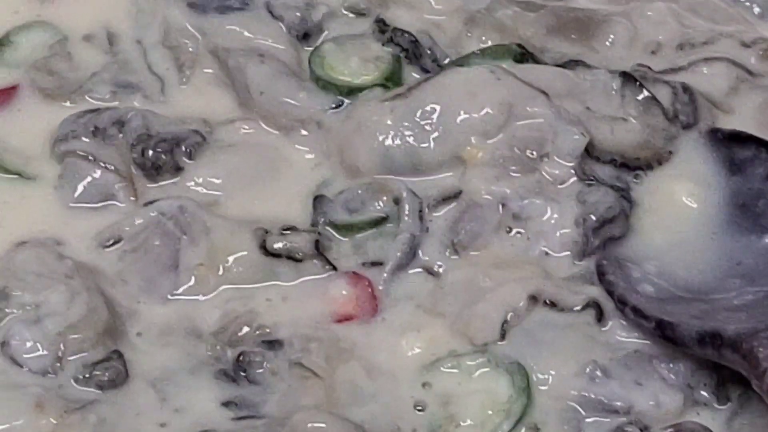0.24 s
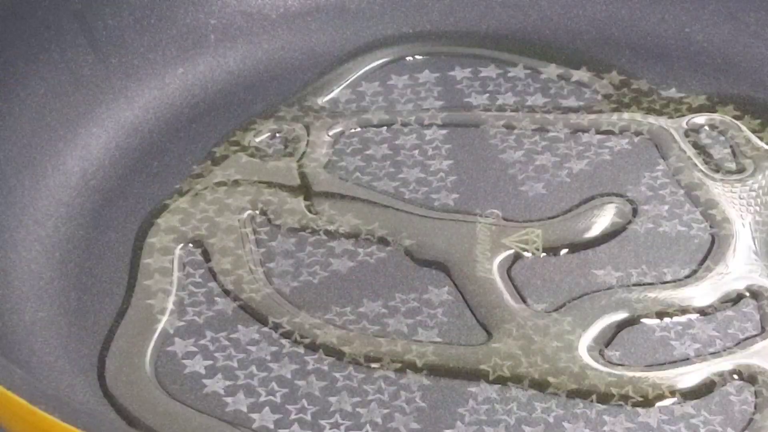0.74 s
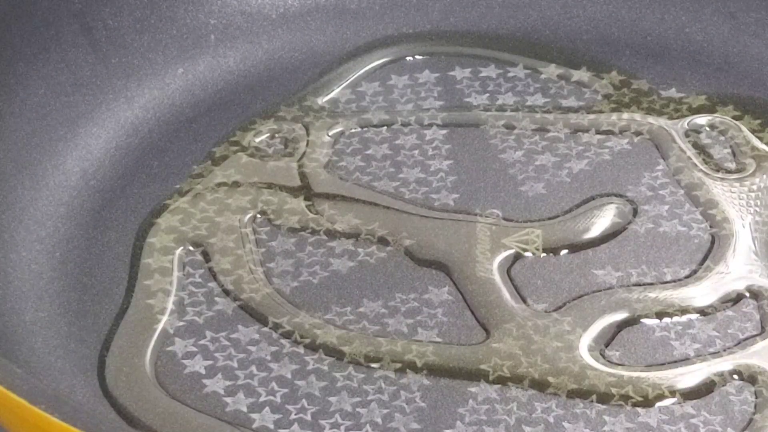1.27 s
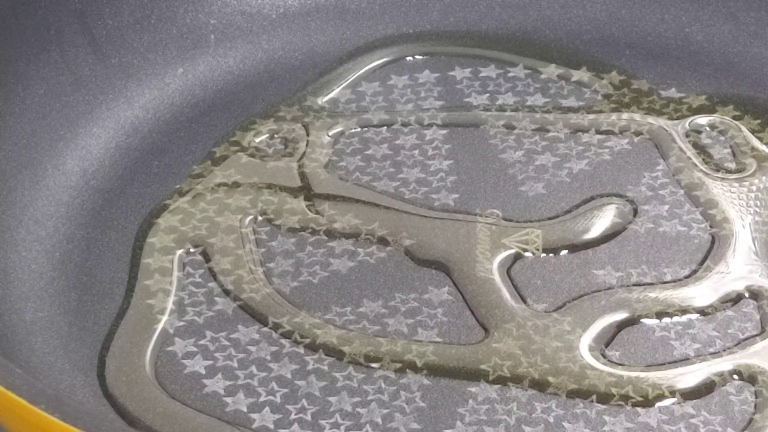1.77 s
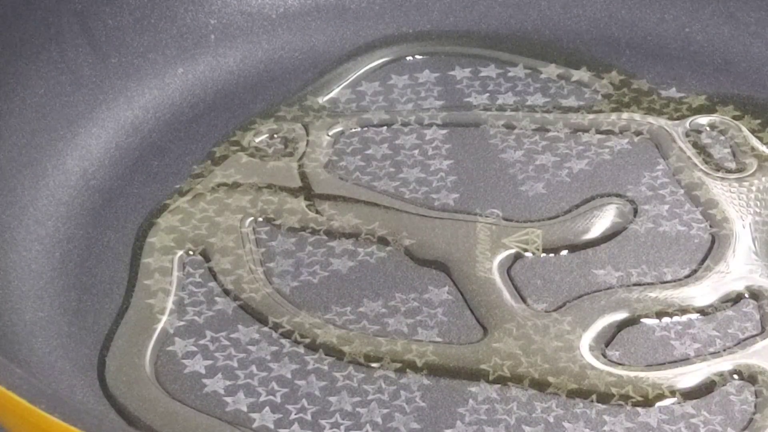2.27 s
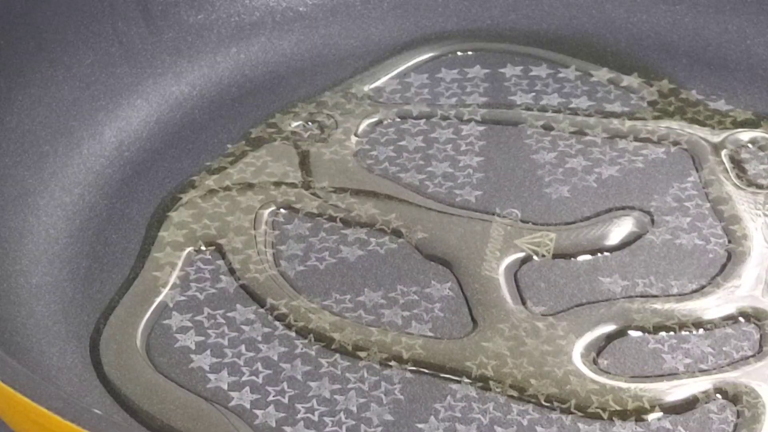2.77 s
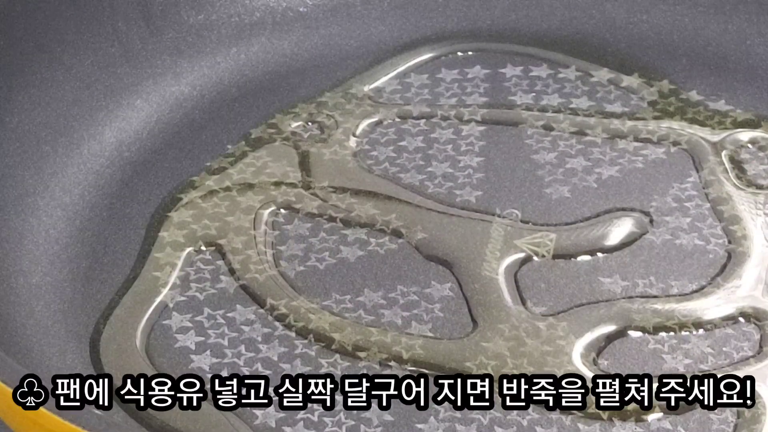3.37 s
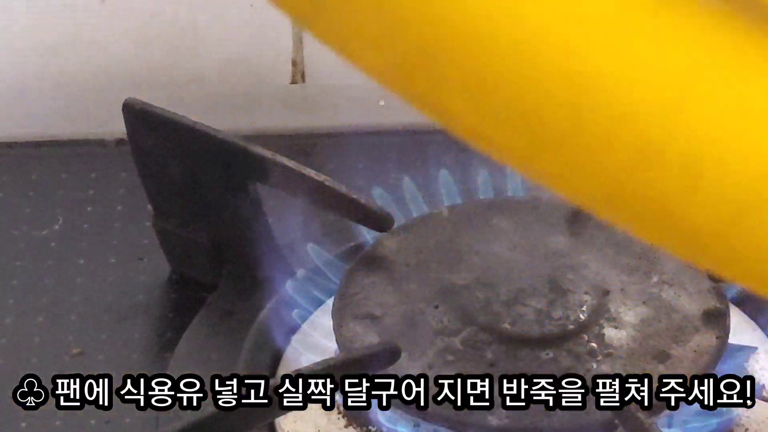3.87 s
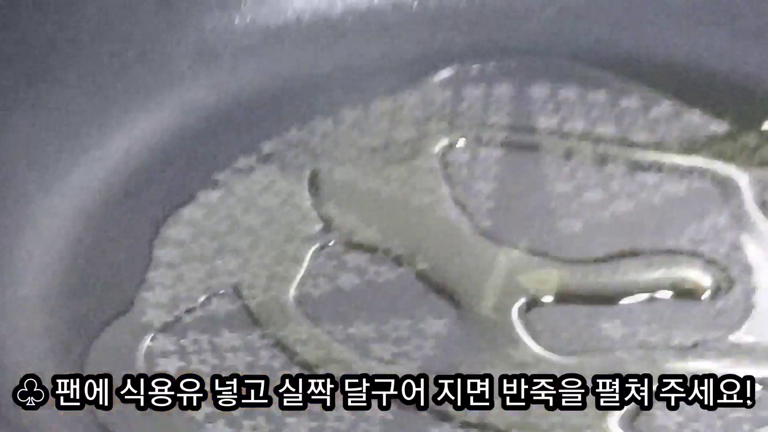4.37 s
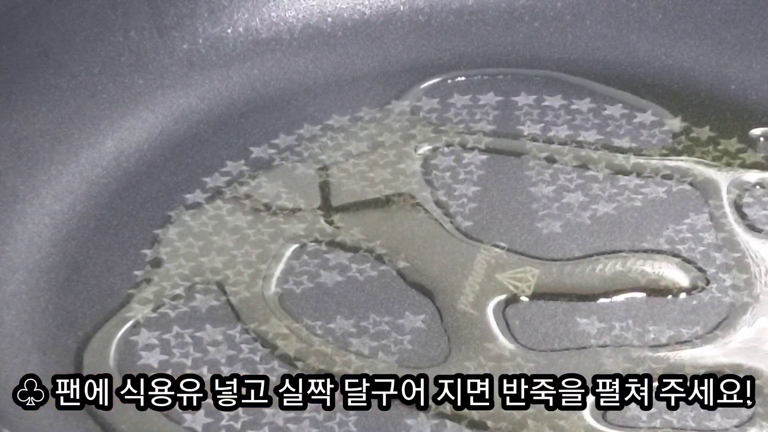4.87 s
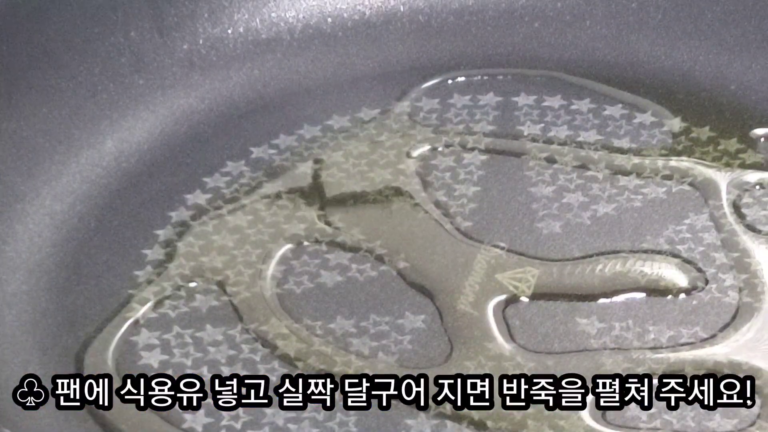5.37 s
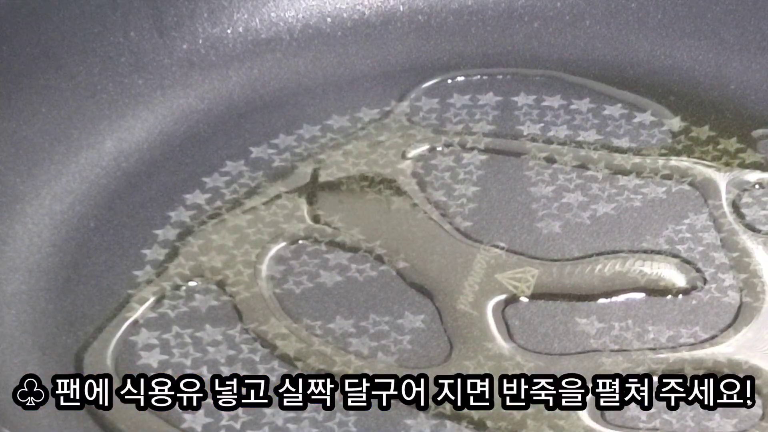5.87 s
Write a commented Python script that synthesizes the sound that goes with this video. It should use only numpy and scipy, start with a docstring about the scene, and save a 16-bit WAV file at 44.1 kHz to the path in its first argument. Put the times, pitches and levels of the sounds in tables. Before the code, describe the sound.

A home kitchen, heard close and fairly dry in stereo. For the first 2.5 s there is only low, soft room noise with tiny handling bumps and faint tones. At about 0.9 s a utensil knocks the worktop with a solid low thud, followed until 1.3 s by a scatter of smaller, duller taps, the clearest near 1.06 s. Faint wet, resonant noise and fine hiss swell and fade around them, and again near 1.7-1.9 s with a weak tick. At 2.5 s a gas burner cuts in abruptly: low fluttering rush under a thin, whistling hiss, continuing to the end. Two soft bumps come near 2.9 s. At 3.6 s the pan is nudged with a low, short judder. At 4.5 s it scrapes loudly and clanks several times on the iron grate, bright and quickly damped, until 4.65 s. The flame dips around 5.1 s; light knocks follow near 5.55, 5.8 and 6.0 s.

```python
"""A frying pan on a gas stove, miked close in a home kitchen: nudged, then scraped and clanked on the grate.
Slips and blows excite its ringing modes, with noise for the iron; three light knocks follow.
From 2.5 s a gas burner rushes and hisses under it, as two bands of shaped noise.
Before that, over low room noise, faint resonant noise and hiss swell up, and utensils knock on the
worktop (decaying modes)."""
import sys
import numpy as np
from scipy import signal
from scipy.fft import rfft, irfft, next_fast_len
from scipy.io import wavfile

SR = 44100
rng = np.random.default_rng(int(sys.argv[2]) if len(sys.argv) > 2 else 0)


def log_audio(samples):
    """Write samples as a 16-bit WAV file to the path given in sys.argv[1]."""
    # one column per channel
    frames = np.atleast_2d(samples).T
    # limit to full scale, then quantise
    limited = np.clip(frames, -1, 1)
    pcm = np.round(limited * 32767).astype(np.int16)
    wavfile.write(sys.argv[1], SR, pcm)


N = 270333
T = np.arange(N) / SR
RING_T = T[:SR // 2]  # time axis of one ringing sound, half a second

# Clatter of the iron grate: (frequency [Hz], relative density [dB per Hz])
GRATE = [(40, -3), (150, 14.5), (300, -0.5), (700, 1.5), (1100, 5), (2450, 3), (2900, -10), (3500, -7.5),
         (7200, -2.5), (8300, -11), (12000, -16.5), (15500, -35)]


def undb(db):
    """Decibels to gain."""
    return 10 ** (np.asarray(db) / 20)


def unit(x):
    """Scale to rms 1."""
    return x / np.sqrt(np.mean(x ** 2))


def unit_attack(x):
    """Scale a blow so that its first 20 ms have rms 1."""
    return x / np.sqrt(np.mean(x[:, :SR // 50] ** 2))


def shape(x, gain):
    """Filter by a gain that is a function of frequency."""
    n = x.shape[-1]
    size = next_fast_len(n)
    hz = np.arange(size // 2 + 1) * SR / size + 1e-3  # just above zero, for the logarithms
    return irfft(rfft(x, size) * gain(hz), size)[..., :n]


def colour(points):
    """Gain through (frequency [Hz], level [dB]) points on a log-frequency axis."""
    hz, db = np.transpose(points)
    return lambda f: undb(np.interp(np.log(f), np.log(hz), db))


def resonant(points, peaks):
    """Gain of a broad colour with (frequency [Hz], width [Hz], height [dB]) resonances standing on it."""
    def gain(f):
        peak_power = sum(undb(db) ** 2 / (1 + (2 * (f - hz) / width) ** 2) for hz, width, db in peaks)
        return colour(points)(f) * np.sqrt(1 + peak_power)
    return gain


def air(gain, n=N, alike_hz=650):
    """Coloured stereo noise: alike at both ears in the bass, unrelated in the treble."""
    mid, side = rng.standard_normal((2, n))
    side = shape(side, lambda f: f / np.hypot(f, alike_hz))
    return unit(shape(np.array([mid + side, mid - side]), gain))


def fade(t60):
    """Exponential decay by 60 dB in t60 seconds."""
    return np.exp(-np.log(1000) * RING_T / t60)


def ring(modes, apart_hz):
    """Decaying modes; the low ones start nearly together and alike at both ears, the high ones out of step."""
    out = 0
    for hz, db, t60 in modes:
        phase = rng.uniform(-np.pi, np.pi, (2, 1)) * min((hz / apart_hz) ** 2, 1)
        out = out + undb(db) * fade(t60) * np.sin(2 * np.pi * hz * RING_T + phase)
    return out


def window(start, length, edge_s=0.005):
    """1 during a stretch of time, with short ramps."""
    ramp_up = np.clip((T - start) / edge_s, 0, 1)
    ramp_down = np.clip((start + length - T) / edge_s + 1, 0, 1)
    return ramp_up * ramp_down


def swell(start, rise, hold, t60):
    """Envelope: a straight rise, a hold, an exponential release."""
    release_t = np.maximum(T - start - rise - hold, 0)
    return np.clip((T - start) / rise, 0, 1) * np.exp(-np.log(1000) * release_t / t60)


def flicker(per_s):
    """Random wavering with a spread a little below 1, from random points joined by straight lines."""
    return np.interp(T * per_s, np.arange(4000), rng.standard_normal(4000))


def add(out, s, sound, pan_db):
    """Mix a sound in at time s, panned by a left minus right level in dB."""
    i = int(s * SR)
    sides = undb(np.array([[pan_db], [-pan_db]]) / 2)
    out[:, i:i + sound.shape[1]] += (sound * sides)[:, :N - i]


def quiet_room(gap_db=-18):
    """Low room noise, lower outside its spans, with soft bumps, faint ringing tones and microphone hiss."""
    # Low noise of the room: (frequency [Hz], relative density [dB per Hz])
    room_colour = [(15, -42), (25, -18), (79, -2), (152, -11), (169, -14.5), (246, -12.5), (305, -18),
                   (433, -21.5), (537, -25.5), (631, -23.5), (1340, -46.5), (1900, -48.5), (15500, -62)]
    # When the room is heard in full: (from [s], to [s])
    room_spans = [(0, .606), (.634, 2.464)]
    # Soft handling bumps: (time [s], length [s], level [dB])
    bump_list = [(0.053, 0.064, -57.5), (0.385, 0.1, -58), (0.757, 0.054, -50), (3.561, 0.037, -41.5)]
    # Faint ringing tones: (time [s], frequency [Hz], level [dB])
    tone_list = [(0.166, 792, -56.5), (.535, 569, -64.5)]
    room_db, mic_hiss_db = -58.5, -83.5
    tone_rise_s, tone_hold_s, tone_t60_s = 0.0202, 0.035, 0.41
    bump_colour = [(30, 6.0), (100, 7.5), (250, -2.0), (600, -9), (2000, -46.0)]
    hiss_colour = [(3000, -24.5), (7000, -12.5), (10000, -2.5), (15000, -6.5)]

    heard = sum(window(a, b - a) for a, b in room_spans)
    floor = air(colour(room_colour)) * undb(room_db) * np.maximum(heard, undb(gap_db))
    bumps = air(colour(bump_colour)) * sum(undb(db) * window(s, length) for s, length, db in bump_list)
    tones = 0
    for s, hz, db in tone_list:
        envelope = swell(s, tone_rise_s, tone_hold_s, tone_t60_s)
        tones = tones + undb(db) * envelope * np.sin(2 * np.pi * hz * T)
    mic_hiss = air(colour(hiss_colour)) * undb(mic_hiss_db)
    return floor + bumps + heard * tones + mic_hiss


def burner(flutter_db=0.24, flutter_per_s=40, flame_pan_db=-0.1, jet_pan_db=1, onset_s=0.0074):
    """The flame rushes and flutters; the gas jet hisses evenly through the resonances of its tube."""
    # Rush of the flame: (frequency [Hz], relative density [dB per Hz])
    flame_colour = [(25, -11), (70, 0), (114, 6), (170, -3), (260, -10.5), (440, -9), (620, -15),
                    (760, -11.5), (1080, -14), (1600, -29), (1900, -26.5), (2600, -34.5), (4500, -48)]
    # Hiss of the gas jet: (frequency [Hz], relative density [dB per Hz])
    jet_colour = [(1500, -72), (2500, 5.5), (3400, 9), (4600, 0.5), (6400, -1), (7700, 2.5), (9200, 1),
                  (11500, 5), (13500, 0.5), (15500, 3.5)]
    # Whistling resonances of the gas jet: (frequency [Hz], width [Hz], height [dB])
    jet_peaks = [(5200, 330, 9), (6370, 390, 10), (7090, 310, 9), (8200, 110, 8), (8770, 165, 13),
                 (9770, 270, 4), (10560, 100, 10.5)]
    # When the burner is heard: (from [s], to [s])
    burner_spans = [(2.506, 6.2)]
    flame_db, jet_db = -43.5, -57.5
    # the burner is quieter for a moment after the pan is set down
    lull_s, lull_width_s, flame_lull_db, jet_lull_db = 5.114, .33, -4, -4.5

    lull = np.exp(-((T - lull_s) / lull_width_s) ** 2)
    flame_level = undb(flame_db + flame_lull_db * lull + flutter_db * flicker(flutter_per_s))
    flame = air(lambda f: colour(flame_colour)(f) / (1 + (f / 4000) ** 6)) * flame_level
    jet = air(resonant(jet_colour, jet_peaks)) * undb(jet_db + jet_lull_db * lull)
    out = np.zeros((2, N))
    add(out, 0, flame, flame_pan_db)
    add(out, 0, jet, jet_pan_db)
    return out * sum(window(a, b - a, onset_s) for a, b in burner_spans)


def noise_swells(waver_db=-0.5, wavers_per_s=140):
    """Short swells of faint, wavering resonant noise, each with a fine hiss that comes and goes."""
    # Swells of faint noise: (time [s], rise [s], hold [s], resonant noise level [dB], hiss level [dB])
    swell_list = [(0.634, 0.0042, 0.066, -65, -69), (0.758, 0.017, 0.071, -58.5, -70),
                  (0.875, 0.014, 0.032, -53, -59.5), (0.943, .015, 0.1, -62, -69.5),
                  (1.026, 0.049, 0.024, -63, -59), (1.258, 0.037, 0.081, -64, -70),
                  (1.358, 0.023, 0.034, -64, -65.5), (1.513, 0.061, 0.19, -87.5, -76),
                  (1.705, 0.013, 0.035, -63, -77), (1.746, 0.075, 0.068, -61.5, -70.5),
                  (1.865, 0.044, 0.022, -50.5, -65.5)]
    # Resonances of the faint noise: (frequency [Hz], width [Hz], height [dB])
    noise_peaks = [(590, 69, 9.5), (1056, 110, 9), (2000, 560, 4), (3030, 200, 6.5), (4350, 260, 4)]
    swell_t60_s = 0.18  # every swell dies away alike
    noise_colour = [(200, -1.0), (600, 7.5), (1400, -2), (2200, -1), (4800, -7.5), (6500, -13.5), (15000, -44.5)]
    hiss_colour = [(1500, -4.0), (4000, -3.5), (9000, -2), (15000, -9.5)]

    noise_power = hiss_power = 0
    for s, rise, hold, noise_db, hiss_db in swell_list:
        envelope = swell(s, rise, hold, swell_t60_s)
        noise_power = noise_power + (undb(noise_db) * envelope) ** 2
        hiss_power = hiss_power + (undb(hiss_db) * envelope) ** 2
    wavering = undb(waver_db * flicker(wavers_per_s))
    noise = air(resonant(noise_colour, noise_peaks)) * np.sqrt(noise_power) * wavering
    hiss = air(colour(hiss_colour)) * np.sqrt(hiss_power)
    return noise + hiss


def knocks(dense_db=-3, dense_t60=0.083, tail_db=-24, tail_t60=0.55,
           utensil_db=-5, utensil_cycles=26, body_q=.6):
    """Blows ring surface modes and a dense rattle: thud, body with the utensil's brief ring, and tick."""
    # Knocks: (time [s], thud [dB], body [dB], tick [dB], utensil pitch [Hz], left minus right [dB])
    knock_list = [(0.888, -18.5, -22.5, -43, 778, 3), (0.891, -55, -27.5, -48, 385, -6),
                  (0.942, -33.5, -48, -60, 940, 4), (1.007, -36, -57, -78, 1050, 3.5),
                  (1.043, -47, -48, -62, 1600, 9), (1.062, -26.5, -33.5, -46, 1070, 3),
                  (1.146, -41.5, -56.5, -78, 970, 2.5), (1.218, -47.5, -67, -81, 1040, 3),
                  (1.275, -52, -53.5, -75, 736, -3), (1.286, -45.5, -43.5, -65, 520, 6),
                  (1.317, -41.5, -48.5, -73, 390, 3), (1.723, -80, -58, -69, 1010, -2),
                  (1.808, -69, -63, -63, 1430, 2), (1.913, -65, -43.5, -60, 773, 2),
                  (2.871, -40, -57, -84, 340, 1.5), (2.887, -34, -56, -84, 342, 1),
                  (5.54, -58, -40.5, -46, 1990, 0), (5.551, -34.5, -42.5, -69, 363, 3.5),
                  (5.779, -26, -30, -41, 584, 3.5), (6.025, -36.5, -32, -46, 1330, 3.5)]
    # Modes of worktop and stove: (frequency [Hz], relative level [dB], t60 [s])
    worktop_modes = [(77.6, -7, 0.2), (108.5, 9.5, 0.15), (162, -4.5, 0.22), (218, -4, 0.207),
                     (341.6, 9.5, 0.073), (419, 2.5, 0.1), (432, -2.5, .08), (543, -4, 0.1),
                     (800, -6, 0.046), (1210, 6.5, 0.051), (1520, 6, .04), (1960, -14.5, 0.038),
                     (2367, -15, 0.029), (2890, -19.5, 0.075), (3277, -20, 0.083), (4460, -18, 0.061)]
    # Dense short ring of a knock: (frequency [Hz], relative level [dB])
    dense_colour = [(30, -27), (110, 9), (160, 9), (260, -10), (380, 3), (900, -5), (1400, -15),
                    (2200, -15.5), (4500, -24), (8000, -31), (15000, -38)]
    thud_below_hz, tick_above_hz = 267, 1870

    out = np.zeros((2, N))
    modes = unit_attack(ring(worktop_modes, apart_hz=993))
    bands = [(thud_below_hz, "low"), ([thud_below_hz, tick_above_hz], "band"), (tick_above_hz, "high")]
    registers = [signal.butter(3, hz, kind, fs=SR, output="sos") for hz, kind in bands]
    for s, *levels, pitch_hz, pan_db in knock_list:
        dense_decay = fade(dense_t60) + undb(tail_db) * fade(tail_t60)
        dense = air(colour(dense_colour), len(RING_T)) * dense_decay
        blow = modes + undb(dense_db) * unit_attack(dense)

        around_pitch = signal.iirpeak(pitch_hz, body_q, fs=SR)
        body = signal.lfilter(*around_pitch, signal.lfilter(*around_pitch, blow))
        utensil = ring([(pitch_hz, 0, utensil_cycles / pitch_hz)], apart_hz=2500)
        body = unit_attack(body) + undb(utensil_db) * unit_attack(utensil)

        knock = 0
        for sos, part, db in zip(registers, [blow, body, blow], levels):
            knock = knock + undb(db) * unit_attack(signal.sosfilt(sos, part))
        add(out, s, knock, pan_db)
    return out


def pan_ring(split=0.014, twin_db=-5, twin_decay=0.33):
    """The handle and rim split each mode of the pan into a close pair that beats."""
    # Modes of the frying pan: (frequency [Hz], relative level [dB], t60 [s])
    pan_modes = [(396, -7.5, 0.046), (575, -9, 0.26), (935, -7, 0.39), (1308, -11, 0.17), (1463, 3, 0.21),
                 (1780, -3.5, 0.16), (2080, -25, 0.079), (2324, 2.5, 0.15), (2522, 2, 0.15),
                 (2590, -8, 0.12), (3203, -1.5, 0.13), (3440, -1, 0.11), (3420, -23, 0.16),
                 (4323, -1, 0.14), (4370, 0.5, 0.12), (5150, -19, 0.102), (5300, -3, 0.11),
                 (6150, -8.5, 0.068), (7060, -31, 0.044), (7600, -2.5, 0.038), (8680, -4.5, 0.05),
                 (9900, -14.5, 0.081)]
    twins = []
    for k, (hz, db, t60) in enumerate(pan_modes):
        twin_hz = hz * (1 + (-1) ** k * split)  # above and below by turns
        twins.append((twin_hz, db + twin_db, t60 * twin_decay))
    return ring(pan_modes + twins, apart_hz=1100)


def slides(slips_per_s=1500, scatter_db=3, rasp_t60=0.025, judder_q=6.1, judder_t60=0.04):
    """Stick-slip: a burst of tiny uneven slips rings the pan, rasps on the iron and makes the grate judder."""
    # Pan slides on the grate:
    # (time [s], length [s], ring level [dB], rasp level [dB], judder level [dB], judder frequency [Hz])
    slide_list = [(3.606, 0.021, -67, -54.5, -36.5, 900), (3.621, 0.027, -51, -42, -39, 340),
                  (3.64, 0.025, -42.5, -48.5, -35, 755), (4.4911, 0.0407, -18, -22.5, -31.5, 550),
                  (4.527, 0.055, -29, -37, -30.5, 630)]

    out = np.zeros((2, N))
    for s, length, ring_db, rasp_db, judder_db, judder_hz in slide_list:
        n = int(length * SR)
        pressure = np.sqrt(np.sin(np.pi * np.arange(n) / n))
        slipping = rng.random(n) < slips_per_s / SR
        slip_size = undb(scatter_db * rng.standard_normal(n))
        slips = slipping * slip_size * rng.choice([-1, 1], n) * pressure

        def judder_gain(f):
            resonance = 1 / np.hypot(1, judder_q * (f / judder_hz - judder_hz / f))
            return resonance / np.hypot(1, f / 1800)  # duller above 1800 Hz

        rasp = air(colour(GRATE), len(RING_T)) * fade(rasp_t60)
        judder = air(judder_gain, len(RING_T)) * fade(judder_t60)
        for response, db in [(pan_ring(), ring_db), (rasp, rasp_db), (judder, judder_db)]:
            sound = signal.fftconvolve(response, slips[None], axes=1)
            slide_rms = np.sqrt(np.sum(sound ** 2) / (2 * n))  # all energy, over the slide's length
            add(out, s, undb(db) * sound / slide_rms, 0)
    return out


def clanks(clatter_t60=0.047, tail_db=-22, tail_t60=0.24):
    """The pan strikes the grate: a hard clatter, the pan's ring, a thump of the stove, a short kitchen tail."""
    # Strikes: (time [s], ring level [dB], clatter level [dB], thump level [dB], contact hardness [Hz],
    # t60 of the grate's damping [s], left minus right [dB])
    clank_list = [(3.662, -39.5, -46, -45.5, 3160, 2.8, 1.5), (4.4952, -42, -33, -51, 10050, 1.1, 11),
                  (4.514, -24.5, -27, -35.5, 7400, 0.97, 6), (4.562, -25.5, -27.5, -29, 3310, 0.054, 2),
                  (4.6069, -25, -17.5, -34, 7060, 0.37, -0.5), (4.617, -23, -24.5, -36, 6860, 0.36, -2)]
    # Modes of the stove frame: (frequency [Hz], relative level [dB], t60 [s])
    stove_modes = [(68, 6, 0.16), (110.2, 3.5, 0.56), (167, 13.5, 0.5)]

    out = np.zeros((2, N))
    thump = unit_attack(ring(stove_modes, apart_hz=800))
    for s, ring_db, clatter_db, thump_db, contact_hz, damping_t60, pan_db in clank_list:
        clatter_decay = fade(clatter_t60) + undb(tail_db) * fade(tail_t60)
        clatter = air(colour(GRATE), len(RING_T)) * clatter_decay
        # a softer touch excites the high modes less; a pan that comes to rest on the iron stops sooner
        touch = signal.butter(2, contact_hz, fs=SR, output="sos")
        metal = signal.sosfilt(touch, pan_ring()) * fade(damping_t60)
        clank = undb(ring_db) * unit_attack(metal) + undb(clatter_db) * unit_attack(clatter)
        add(out, s, clank + undb(thump_db) * thump, pan_db)
    return out


def scene():
    """Room, burner, swells of faint noise, knocking utensils and the moving pan."""
    return quiet_room() + burner() + noise_swells() + knocks() + slides() + clanks()


def record(dry):
    """The microphone drops the deepest bass and cuts the top."""
    top_hz = 15800
    dry = signal.sosfilt(signal.butter(2, 25, "high", fs=SR, output="sos"), dry)
    return signal.sosfilt(signal.ellip(10, .2, 80, top_hz, fs=SR, output="sos"), dry)


dry = scene()
out = record(dry)
log_audio(out)
```